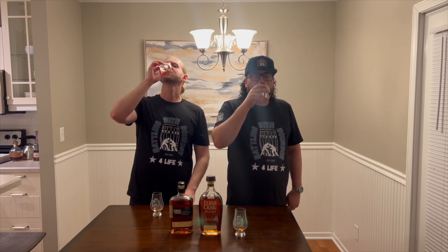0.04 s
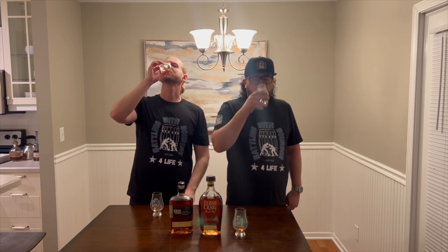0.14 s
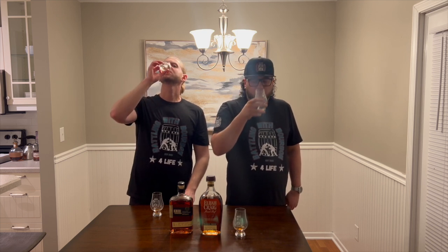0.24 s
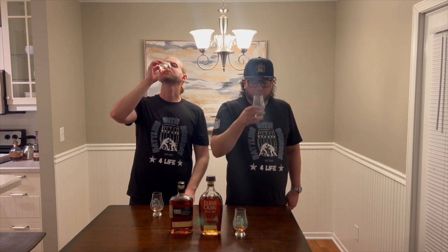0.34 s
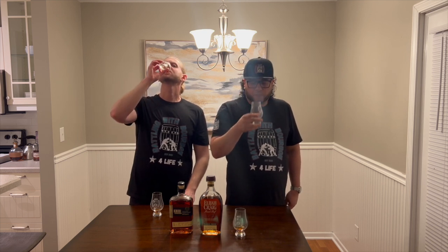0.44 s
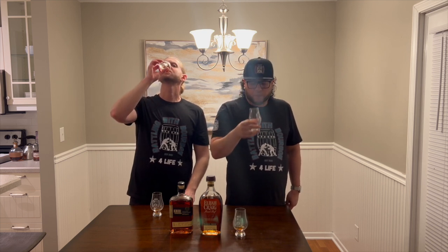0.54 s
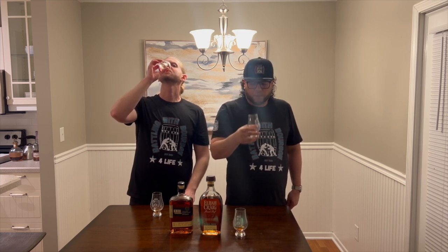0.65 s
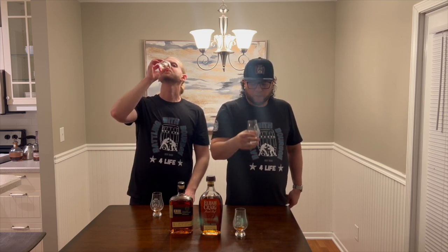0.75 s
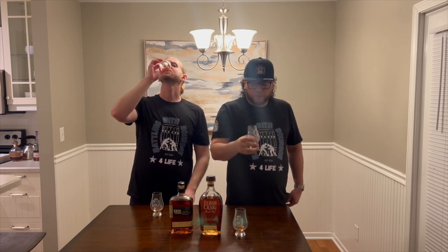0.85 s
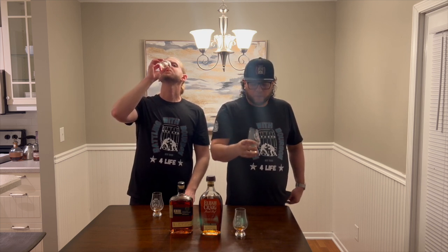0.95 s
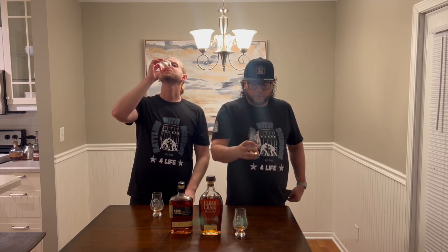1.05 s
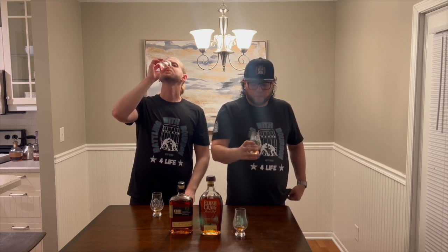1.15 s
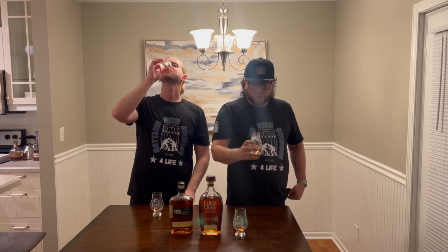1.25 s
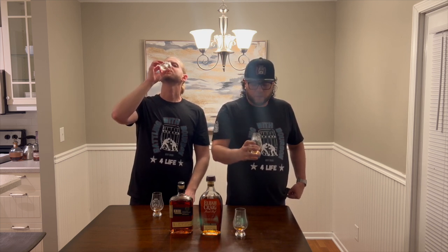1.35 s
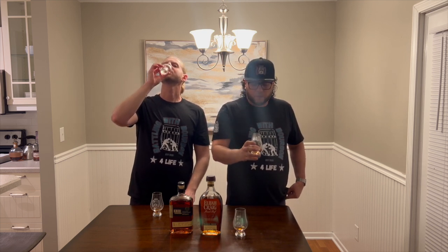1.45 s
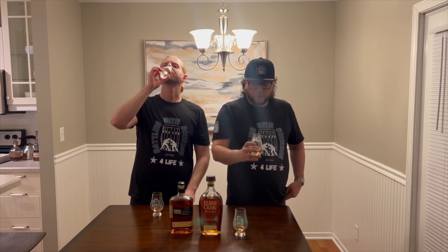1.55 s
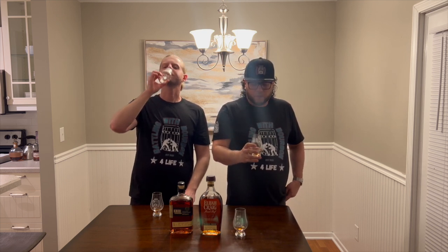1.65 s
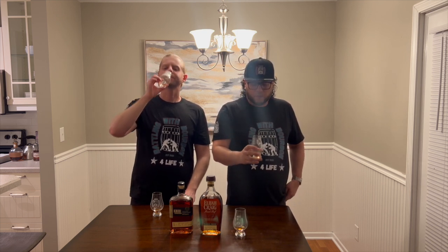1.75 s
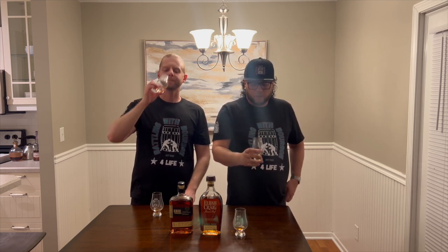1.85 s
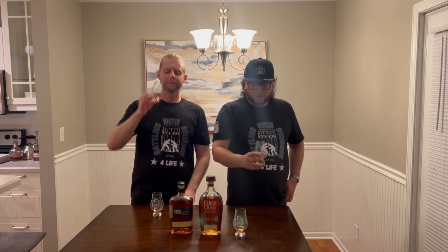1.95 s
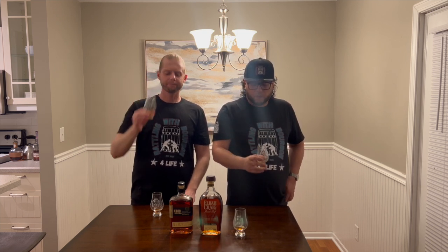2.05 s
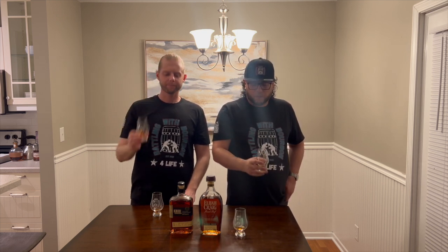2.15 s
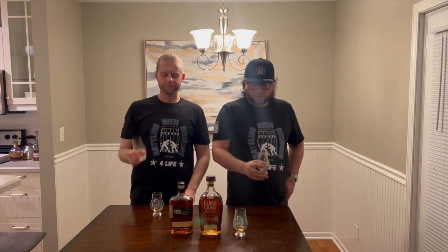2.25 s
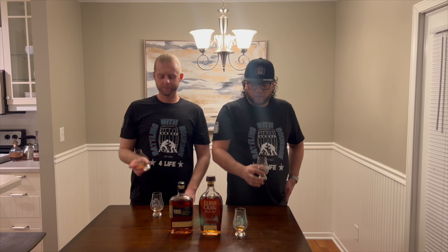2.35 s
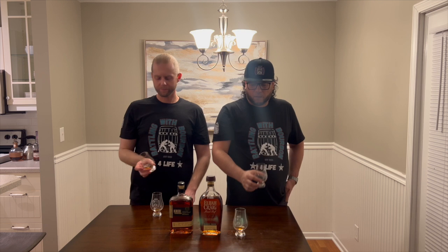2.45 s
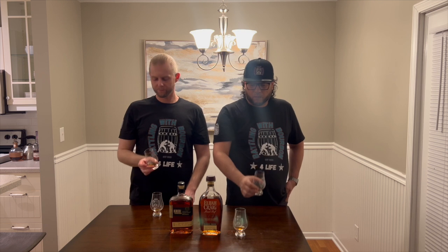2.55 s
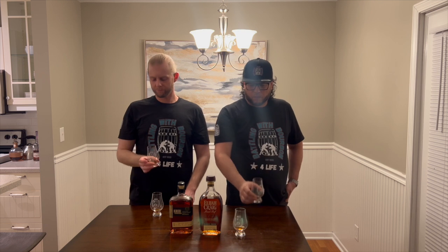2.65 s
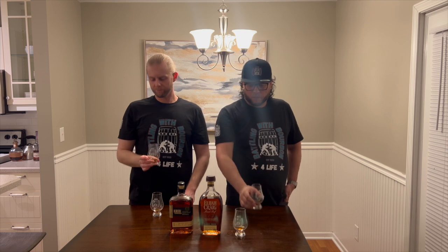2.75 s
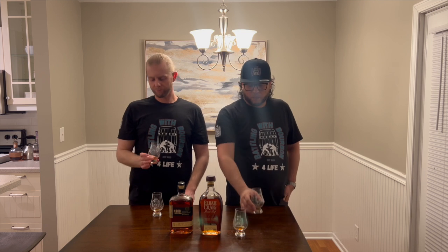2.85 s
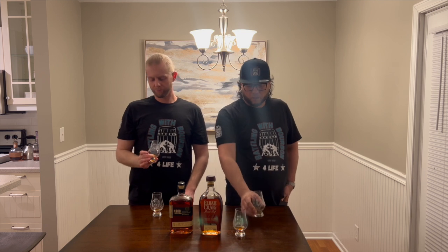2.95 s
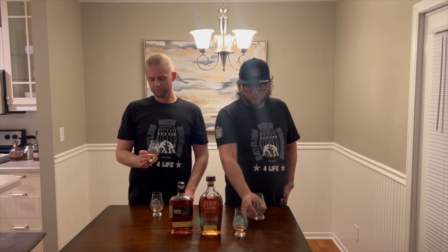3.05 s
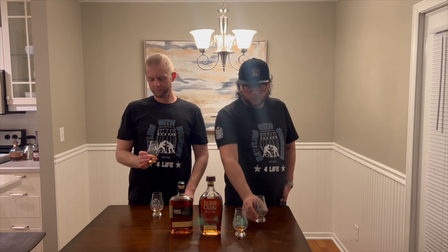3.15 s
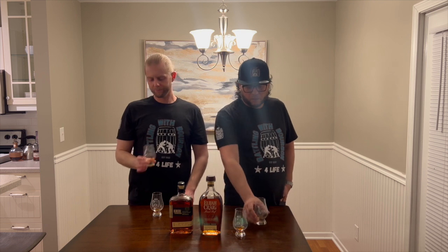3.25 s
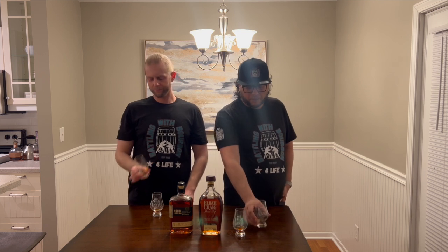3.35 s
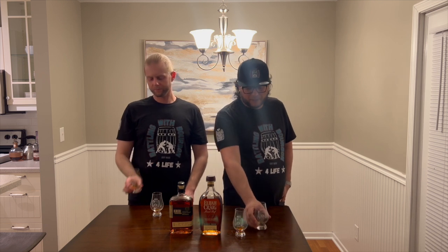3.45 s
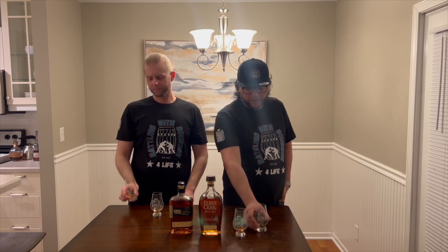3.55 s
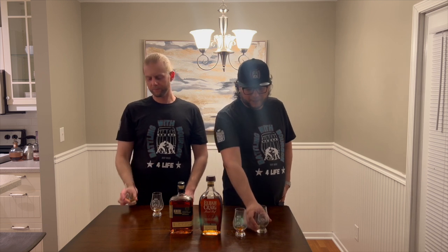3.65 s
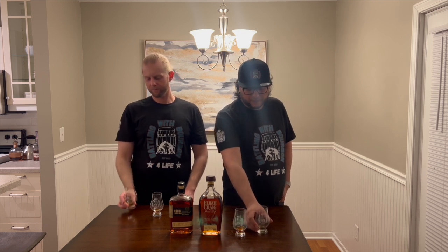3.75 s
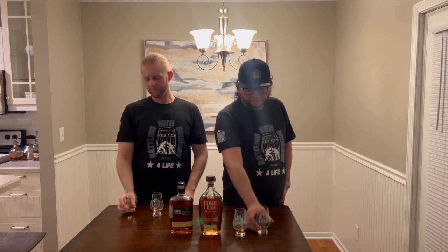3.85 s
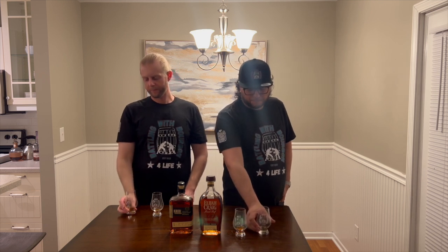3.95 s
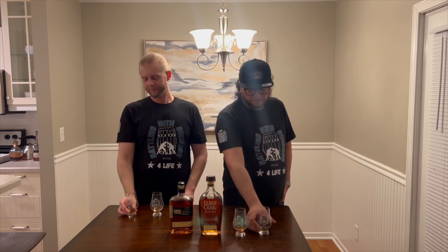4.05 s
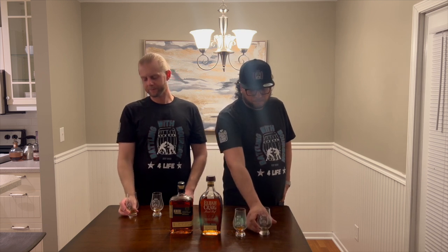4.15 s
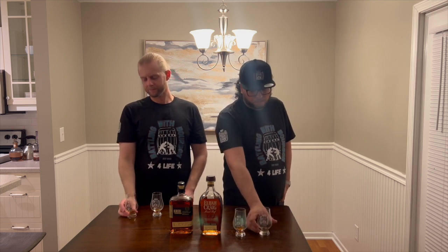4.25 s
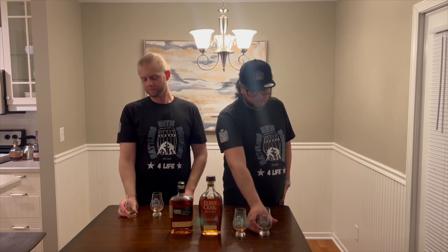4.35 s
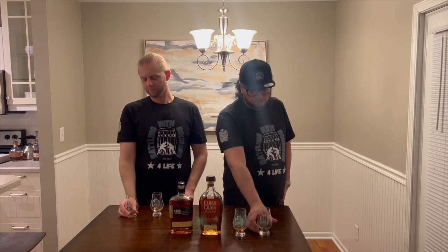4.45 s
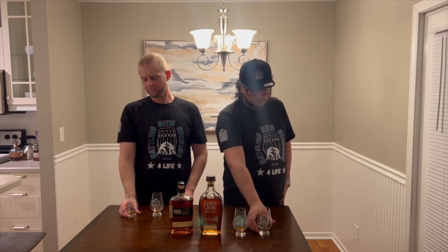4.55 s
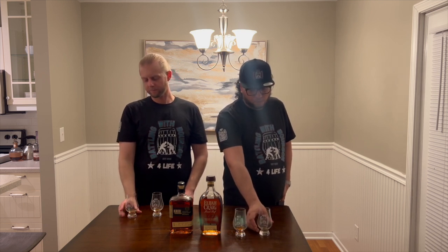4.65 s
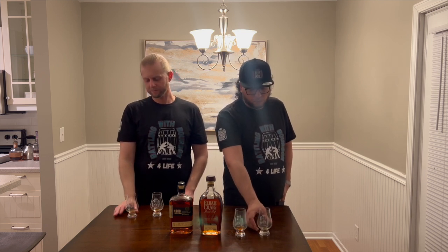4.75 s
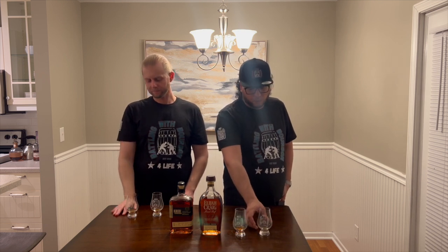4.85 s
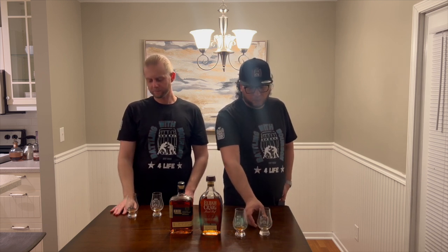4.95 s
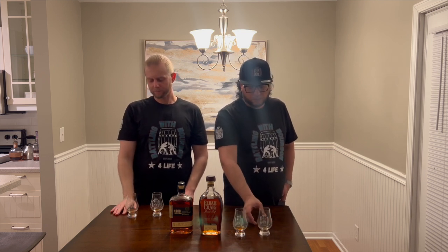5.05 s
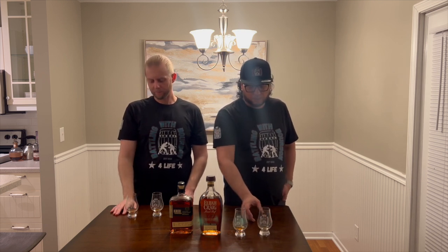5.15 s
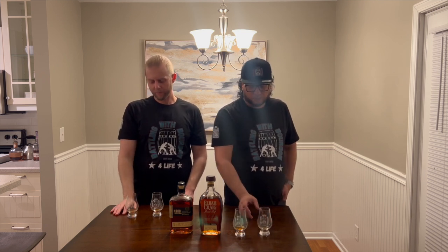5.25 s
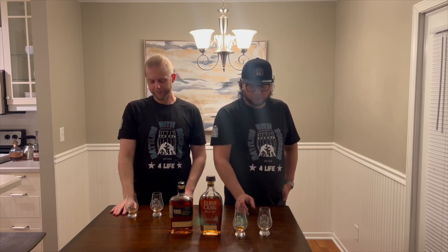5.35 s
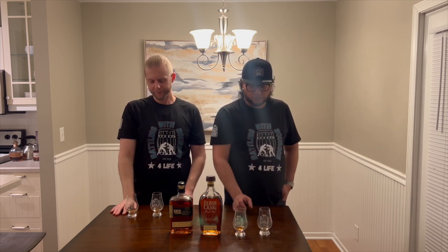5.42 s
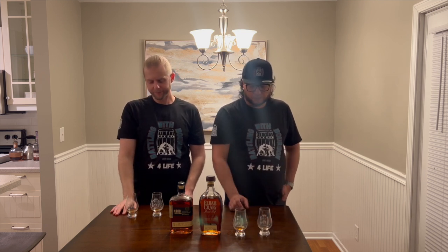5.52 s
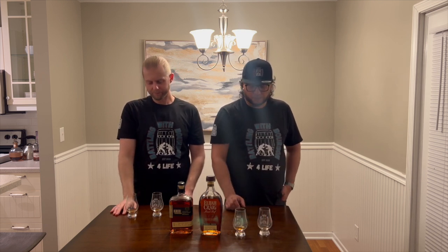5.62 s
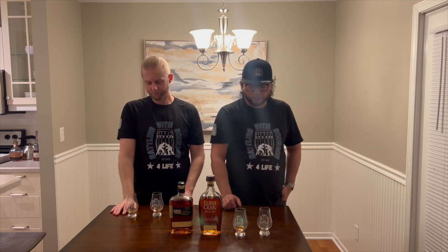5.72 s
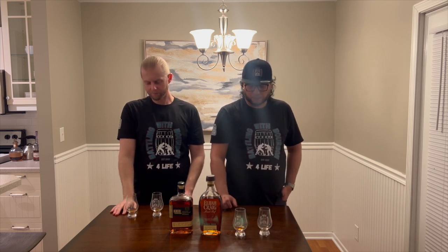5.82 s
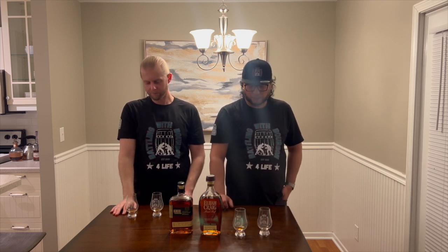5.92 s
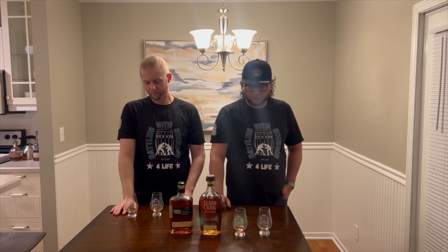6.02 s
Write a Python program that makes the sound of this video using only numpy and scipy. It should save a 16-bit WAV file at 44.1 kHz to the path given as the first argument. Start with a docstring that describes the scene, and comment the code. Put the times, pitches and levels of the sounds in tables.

```python
"""A small, hard-walled dining room, with a stereo microphone near a wooden table.
Two tasting glasses are set down in three knocks: each time the foot cracks against the wood, the
table top rings low and late, and the bowl pings. Fingers and rings tap lightly; sleeves rustle.
Farther off, a fridge compressor hums and buzzes from the kitchen on the left."""
import sys
import numpy as np
from scipy import signal
from scipy.fft import rfft, irfft
from scipy.io import wavfile
from scipy.ndimage import uniform_filter1d

SR = 44100
rng = np.random.default_rng(int(sys.argv[2]) if len(sys.argv) > 2 else 0)


def output_pcm(signal):
    """Save a mono or channel-first signal as 16-bit PCM at the path in sys.argv[1].

    Samples are clipped to [-1, 1] before scaling.
    """
    pcm = np.clip(np.atleast_2d(signal).T, -1, 1) * 32767
    wavfile.write(sys.argv[1], SR, np.round(pcm).astype(np.int16))


N = 268172
T = np.arange(N) / SR
BIN_HZ = np.arange(N // 2 + 1) * SR / N
LEFT, RIGHT = np.array([[1], [0]]), np.array([[0], [1]])

# Lean of the background toward the kitchen. Each row: frequency in Hz, left minus right in dB.
KITCHEN_BALANCE = [(60, -3.5), (110, 5.5), (200, 4.5), (380, 6), (700, -3), (1290, 12.5), (2380, 13.0),
                   (4400, 16.5), (8120, 18), (15000, 4.5)]
# How alike diffuse sound is in the two channels. Each row: frequency in Hz, likeness from 0 to 1.
ROOM_LIKENESS = [(60, 0.98), (130, 0.73), (290, 0.99), (640, 0.02), (1400, 0.06), (9000, 0.03)]


def undb(db):
    """Decibels to gain."""
    return 10 ** (np.asarray(db) / 20)


def over_hz(table, outside=None):
    """Rows of frequency and value, read at every FFT bin on a log axis."""
    hz, value = np.transpose(table)
    return np.interp(np.log(BIN_HZ + 1), np.log(hz), value, outside, outside)


def noise(colour, likeness):
    """Stereo noise of the given colour and likeness between channels, rms 1."""
    mid, side = rfft(rng.standard_normal((2, N)))
    pair = np.sqrt(1 + likeness) * mid + np.sqrt(1 - likeness) * side * (LEFT - RIGHT)
    out = irfft(pair * colour, N)
    return out / np.sqrt(np.mean(out ** 2))


def waver(rate_hz):
    """Random levels, each held 1 / rate_hz seconds, smoothed twice."""
    hold = int(SR / rate_hz)
    steps = np.repeat(rng.standard_normal(N // hold + 1), hold)
    return uniform_filter1d(uniform_filter1d(steps, hold), hold)[:N]


def ring(start, hz, t60, rise=0.00011):
    """One struck mode: a sine with a rounded start that falls 60 dB in t60 seconds."""
    t = np.clip(T - start, 0, None)
    return np.sin(2 * np.pi * hz * t) * (1 - np.exp(-t / rise)) ** 2 * 1000. ** (-t / t60)


def pan(x, db):
    """Place a sound by its left minus right level in dB."""
    return x * undb(db * (LEFT - RIGHT) / 2)


def room_tone():
    """Smooth air and appliance noise, louder on the kitchen side."""
    # Each row: frequency in Hz, relative density in dB.
    spectrum = [(22, -22.5), (30, -20), (40, -23), (75, -12.5), (100, -14.5), (150, -16.5), (300, -18),
                (420, -22.5), (700, -32.5), (1300, -37.5), (2600, -48.5), (5000, -57.5), (7500, -68),
                (9500, -87.5)]
    colour = pan(undb(over_hz(spectrum, outside=-79)), over_hz(KITCHEN_BALANCE))
    return undb(-51.5) * noise(colour, over_hz(ROOM_LIKENESS))


def fridge():
    """The compressor, a room away: a swelling hum, wavering partials, casing buzz pulsing once a turn."""
    # Swell of the fundamental. Each row: time in seconds, level in dB.
    swell = [(0.0, -44), (0.71, -48.5), (0.78, -50), (1.27, -49), (1.76, -43.5), (2.2, -45), (3.28, -42.5),
             (3.61, -40.5), (4.27, -38), (5.0, -39), (5.81, -45), (6.08, -41.5)]
    # Each row: multiple of the fundamental, level in dB, left minus right in dB.
    partials = [(0.514, -64.5, -2.5), (2.057, -53, 3.5), (5.217, -63.5, 7.5), (5.975, -71, -18),
                (7.975, -68, -7.5), (9.01, -67, -0.5), (10.1, -67, 4), (13.03, -74, 5.5),
                (17.25, -80.5, 6.5), (19.05, -77.5, -4.5), (20.4, -80, 6), (22.05, -79.5, -8.5),
                (30.37, -79.5, 19)]
    # Noise bands of the casing. Each row: centre in Hz, width in Hz, level in dB.
    buzz_bands = [(540, 220, -66.5), (1010, 108, -72), (1805, 437, -63), (3730, 330, -76),
                  (6420, 780, -76.5)]
    hum_hz, waver_db, buzz_depth = 58.59, 2.5, 0.18
    turn = 2 * np.pi * hum_hz * (T - LEFT * 10 / SR)  # the hum reaches the left capsule late
    out = np.sqrt(2) * undb(np.interp(T, *np.transpose(swell))) * pan(np.sin(turn), 0.65)
    for multiple, db, pan_db in partials:
        gain = np.sqrt(2) * undb(db + waver_db * waver(rate_hz=6))
        out += pan(gain * np.cos(multiple * turn + rng.normal(0, 0.53)), pan_db)
    pulse = np.exp(buzz_depth * (np.cos(turn) - .5))
    for hz, width, db in buzz_bands:
        colour = pan(np.exp(-((BIN_HZ - hz) / width) ** 2), over_hz(KITCHEN_BALANCE))
        out += undb(db) * pulse * noise(colour, over_hz(ROOM_LIKENESS))
    return out


def wall_echo(sound):
    """Dense reflections off hard walls, fed by the left channel: they build up, then die band by band."""
    # Each row: band centre in Hz, t60 in seconds, relative level in dB.
    decay_bands = [(223, 1.0, 6.5), (416, 0.91, 5), (738, 1, 7.5), (1650, 0.77, 4), (3220, 0.58, 8.5),
                   (6480, 0.52, 8.5), (12000, .2, -11)]
    # The small room returns no deep bass. Each row: frequency in Hz, gain in dB.
    bass_cut = [(165, -26), (215, 2.5), (16000, -3.5)]
    fill_s, knee_s = 0.0015, 0.3  # past the knee the tail falls away faster
    tail = 0
    for hz, t60, db in decay_bands:
        passband = [(hz / 2, -30), (hz / 1.486, -3), (hz, 0), (hz * 1.43, -3), (hz * 2, -30)]
        colour = undb(over_hz(passband, outside=-200) + over_hz(bass_cut))
        band = noise(colour, over_hz(ROOM_LIKENESS))
        envelope = (1 - np.exp(-T / fill_s)) * 1000. ** (-T / t60) * np.exp(-(T / knee_s) ** 4)
        tail += undb(db) * band * envelope * np.sqrt(hz / SR / np.sum(envelope ** 2))
    return signal.fftconvolve(sound[:1], tail[:, :SR], axes=1)[:, :N]


def sleeves():
    """Cloth slides in flickering swishes: fine hiss in the centre, two lower bands wide and to the left."""
    # Each row: loudest moment, rise and fall in seconds, then top, middle and low band levels in dB.
    swishes = [(0.67, .12, 0.083, -75.5, -76.5, -71), (1.02, 0.18, 0.13, -76.5, -80, -79),
               (1.32, 0.044, .05, -79, -86, -77), (1.46, 0.056, .05, -78, -80, -80),
               (1.58, 0.045, .04, -77, -79, -80), (1.74, .05, .05, -77.5, -84, -77),
               (1.85, .04, 0.073, -76.5, -81, -73), (2.17, 0.1, 0.071, -71, -72, -71.5),
               (2.34, 0.046, 0.078, -73.5, -73, -72.5), (2.6, 0.077, .05, -77, -78, -78),
               (2.74, 0.08, 0.11, -74, -75, -76), (3.38, .08, .1, -78.5, -82, -77),
               (3.59, .015, 0.022, -79, -77, -80), (4.7, 0.063, 0.1, -68.5, -73.5, -77),
               (4.86, 0.078, 0.069, -64.5, -62.5, -67.5), (5.08, 0.081, 0.23, -76, -76.5, -70),
               (5.28, 0.059, 0.07, -71, -72, -67), (5.42, 0.077, 0.17, -73.5, -72, -66.5),
               (5.8, .14, .12, -69.5, -71, -71)]
    # Colours of the three bands. Each row: frequency in Hz, relative density in dB.
    top_band = [(10300, -19), (10800, 0.5), (13000, 0), (15000, 0), (15900, -10.5)]
    middle_band = [(5000, -2.5), (6500, -4), (7800, -1), (8800, -3), (9400, -17)]
    low_band = [(2200, -4.5), (3200, -8.5), (4500, -6.5), (5600, -12.5), (7000, -41)]
    power = undb([-87, -87, -83])[:, None] ** 2  # faint hiss between swishes
    for peak_s, rise, fall, *band_db in swishes:
        swell = np.exp(-((T - peak_s) / np.where(T < peak_s, rise, fall)) ** 2)
        power = power + undb(band_db)[:, None] ** 2 * swell
    top, middle, low = np.sqrt(power)
    flicker = undb(1.4 * waver(rate_hz=25))
    out = top * flicker * noise(undb(over_hz(top_band, outside=-84)), likeness=0.77)
    for band, gain in ((middle_band, middle), (low_band, low)):
        flicker = undb(1.5 * waver(rate_hz=30))
        hiss = noise(undb(over_hz(band, outside=-71)), likeness=0.25)
        out += gain * flicker * pan(hiss, 4)
    return out


def finger_taps():
    """Light touches of fingers, rings and glass, each sounding one brief mode."""
    # Each row: start in seconds, level in dB, pitch in Hz, t60 in seconds, left minus right in dB.
    touches = [(2.207, -60, 5130, 0.05, 7), (2.209, -63, 5075, .09, 14), (2.222, -66, 5820, 0.045, 18),
               (4.855, -47.5, 3700, 0.0082, 6), (4.854, -44.5, 4750, 0.0092, 0),
               (4.871, -55, 5180, 0.013, 7), (4.931, -52, 7500, 0.008, 0), (5.303, -33, 1750, 0.0081, 5),
               (5.304, -49, 2600, 0.0049, 0)]
    return sum(pan(undb(db) * ring(start, hz, t60, rise=0.8 / hz), pan_db)
               for start, db, hz, t60, pan_db in touches)


def glasses():
    """A foot knocks and cracks on the wood, the table's modes fill in from the top down, the bowl pings."""
    # Each row: start in seconds, level in dB, knock pitch in Hz, knock t60 in seconds, spot on the table
    # from 0 (left) to 1 (right), crack in relative dB, bowl pitch in Hz, bowl in relative dB,
    # bowl t60 in seconds, left minus right in dB.
    landings = [(3.6570, -20, 975, 0.015, 0, -28.5, 7950, -59, 0.064, -1),
                (3.7754, -19, 950, 0.012, 0.21, -28.5, 8100, -80, .06, -9),
                (4.2252, -7.5, 1338, 0.012, 0.86, -19, 8290, -51, 0.14, 4)]
    # Modes of the table top. Each row: pitch in Hz, t60 and rise in seconds, then relative level in dB
    # when struck at the left spot and at the right spot.
    top_modes = [(212.3, 0.16, 0.015, -7, -19.5), (236.1, 0.2, 0.024, -5.5, -10),
                 (312, 0.1, 0.0056, -7.5, -19), (357, 0.15, 0.0033, -11.5, -15),
                 (394.6, 0.15, 0.0098, -13, -3), (432.8, 0.13, 0.0039, -17.5, -2),
                 (460.7, 0.083, 0.0036, -9.5, -12.5), (550, 0.1, 0.0052, -13, -13.5),
                 (674, 0.047, 0.0015, -7.5, -8.5), (880, 0.044, 0.0013, -15.5, -8),
                 (960, 0.02, 0.0016, -19.5, 3), (1182, 0.075, 0.0023, -16, -5),
                 (1403, 0.029, 0.001, -13, -10), (1565, 0.036, 0.00028, -16.5, -11),
                 (1928, 0.043, 0.00094, -24, -14), (2317, 0.023, 0.00067, -27.5, -17.5)]
    # Colour of the contact crack. Each row: frequency in Hz, relative density in dB.
    crack_spectrum = [(1200, -16), (2200, -3), (3500, 1), (5000, -6.5), (7000, -16), (10000, -26),
                      (15000, -12)]
    knock_db, ping_db, bowl_split = 2.5, 14, 0.0023
    crack_delay_s, top_lag_s, bowl_lag_s = 0.001035, 0.0001, 0.00003  # lags are at the right capsule
    wood, cracks, bowls = np.zeros((3, 2, N))
    crack = irfft(undb(over_hz(crack_spectrum, outside=-48.5)), N)
    crack /= crack.max()
    for start, db, knock_hz, knock_t60, spot, crack_db, bowl_hz, bowl_db, bowl_t60, pan_db in landings:
        knock = undb(knock_db) * ring(start, knock_hz, knock_t60, rise=0.0008)
        top = sum(undb(left + spot * (right - left)) * ring(start + RIGHT * top_lag_s, hz, t60, rise)
                  for hz, t60, rise, left, right in top_modes)
        wood += undb(db) * (pan(knock, pan_db) + top)
        cracks += pan(undb(db + crack_db) * np.roll(crack, int((start + crack_delay_s) * SR)), pan_db)
        arrival = start + RIGHT * bowl_lag_s
        ping = undb(ping_db) * ring(arrival, bowl_hz, t60=0.021)
        twin = 0.62 * ring(arrival, bowl_hz * (1 + bowl_split), bowl_t60)  # beats with the main mode
        bowls += undb(db + bowl_db) * (ping + ring(arrival, bowl_hz, bowl_t60) + twin)
    return wood, cracks, bowls


def scene():
    """Glasses, taps and their echo over the fridge, the room tone and the sleeves."""
    wood, cracks, bowls = glasses()
    taps = finger_taps()
    direct = wood + taps + bowls + 0.53 * cracks  # the foot shields the microphone from the crack
    echo = wall_echo(wood + 0.6 * taps + cracks + 0.37 * bowls)  # little of the thin ping comes back
    return direct + echo + fridge() + room_tone() + sleeves()


def record(dry):
    """The recorder cuts the top treble steeply."""
    cutoff_hz = 15700
    return signal.sosfilt(signal.ellip(10, .2, 70, cutoff_hz, fs=SR, output="sos"), dry)


dry = scene()
out = record(dry)
output_pcm(out)
```